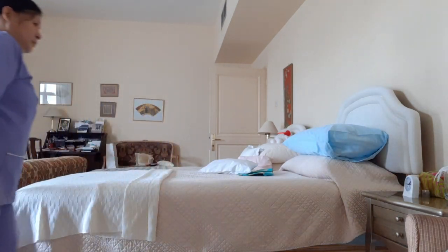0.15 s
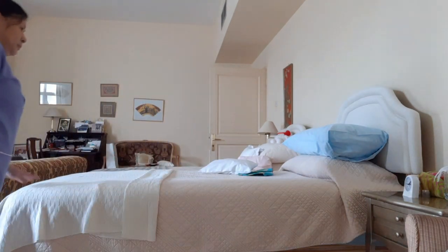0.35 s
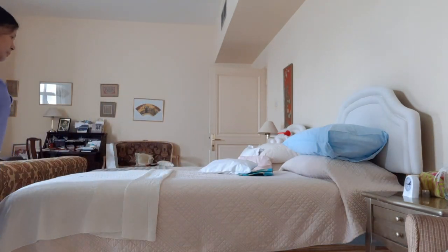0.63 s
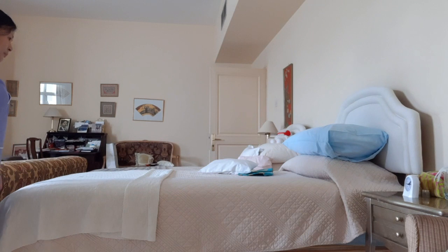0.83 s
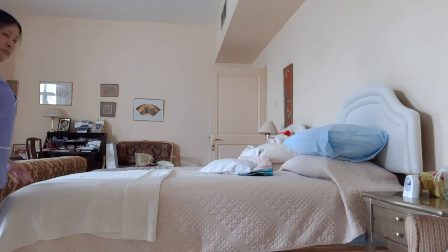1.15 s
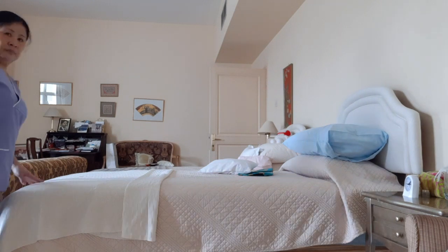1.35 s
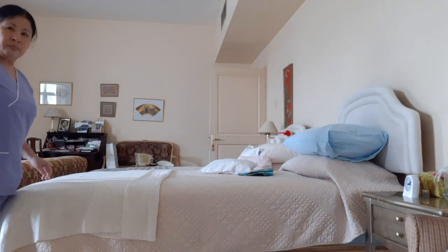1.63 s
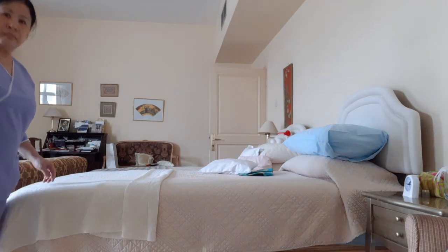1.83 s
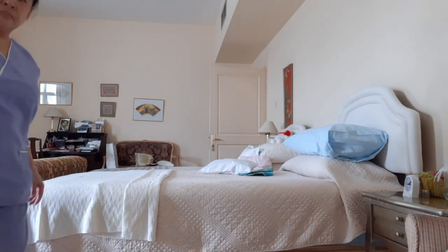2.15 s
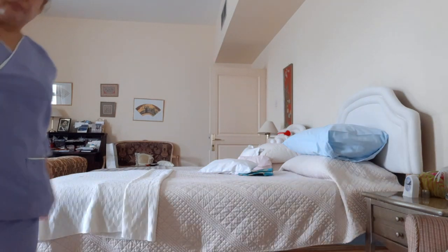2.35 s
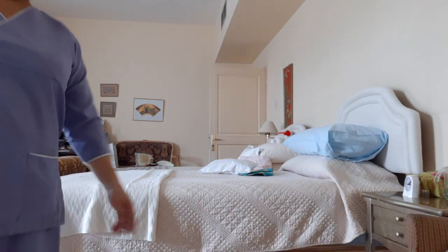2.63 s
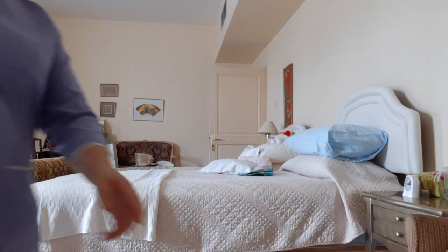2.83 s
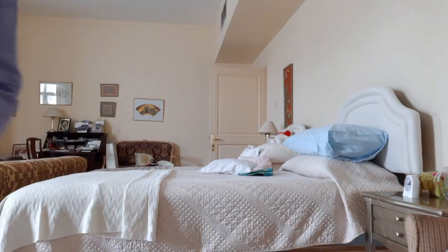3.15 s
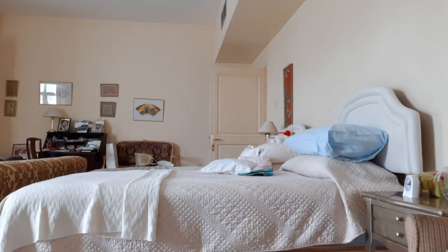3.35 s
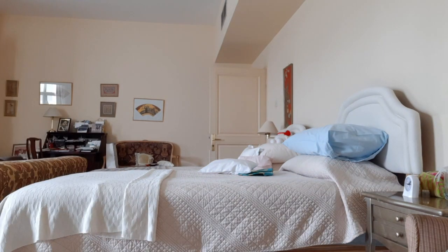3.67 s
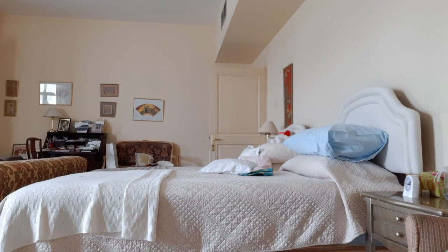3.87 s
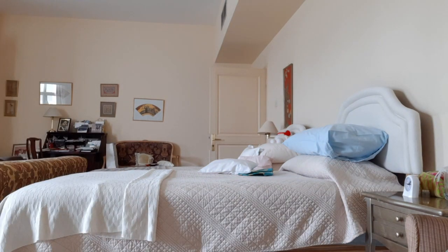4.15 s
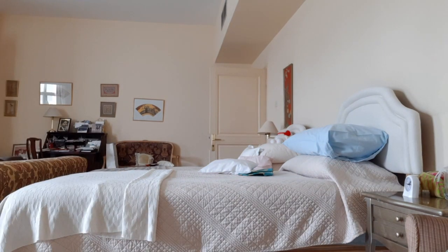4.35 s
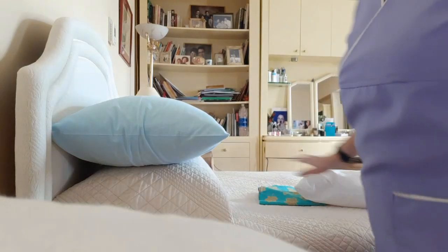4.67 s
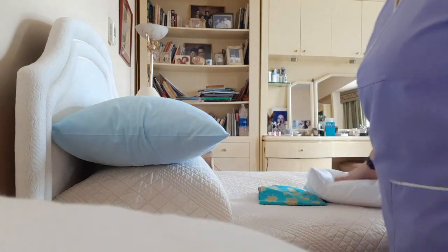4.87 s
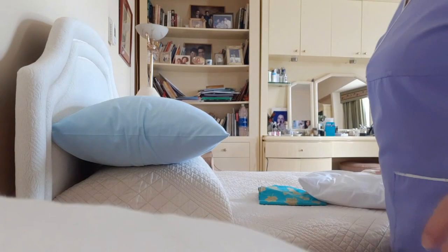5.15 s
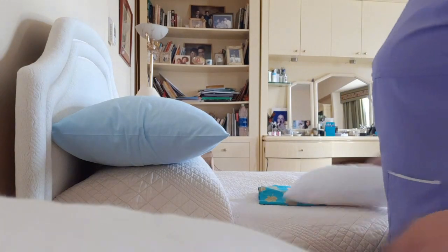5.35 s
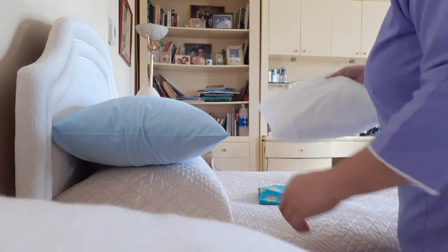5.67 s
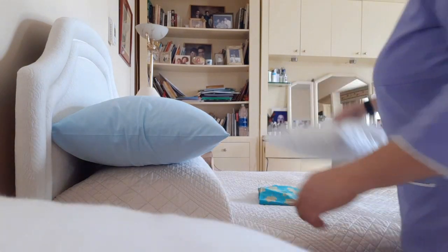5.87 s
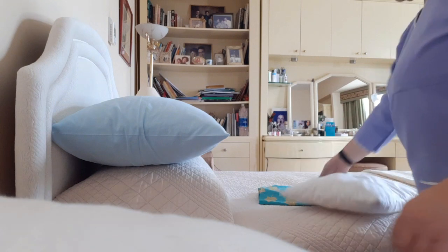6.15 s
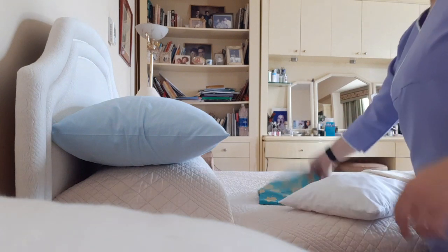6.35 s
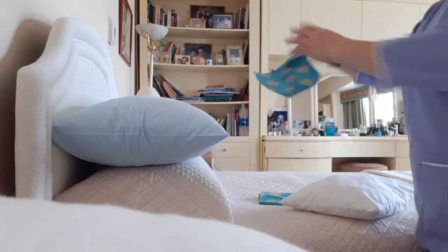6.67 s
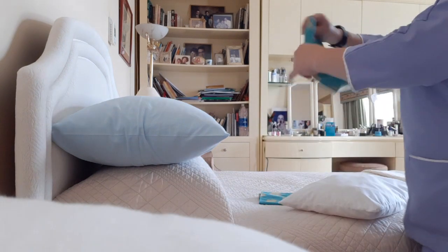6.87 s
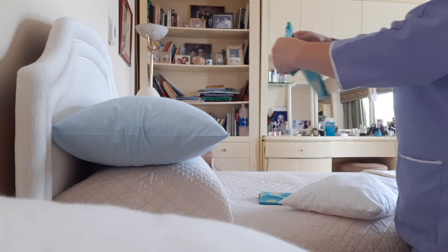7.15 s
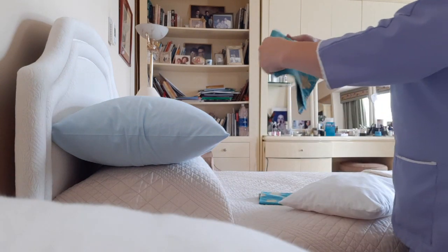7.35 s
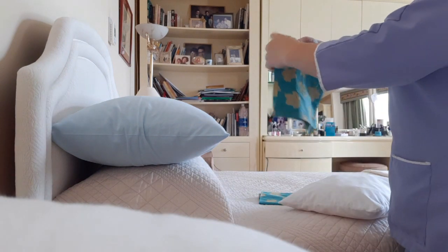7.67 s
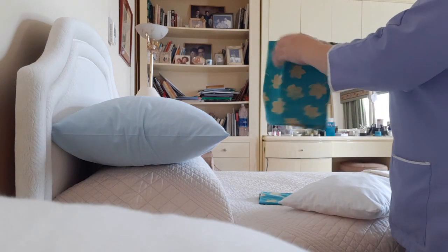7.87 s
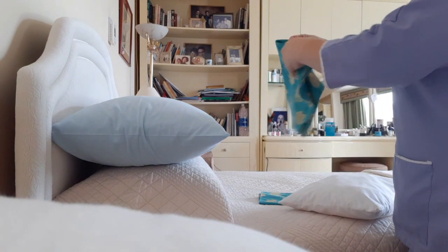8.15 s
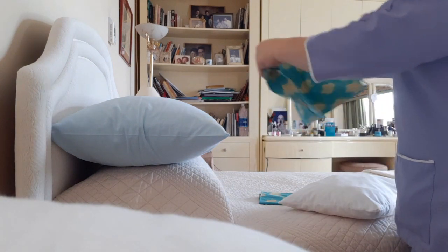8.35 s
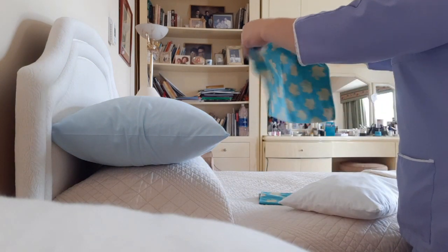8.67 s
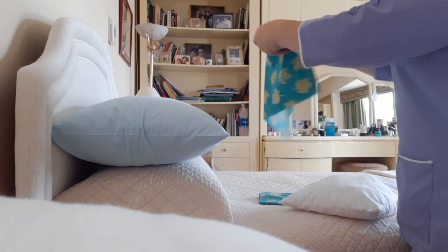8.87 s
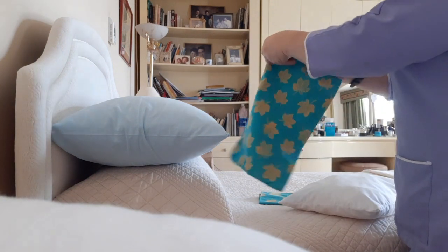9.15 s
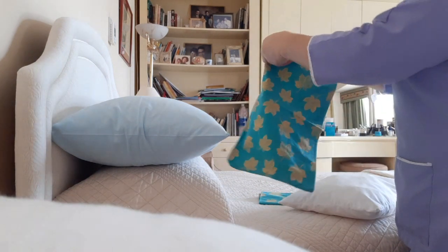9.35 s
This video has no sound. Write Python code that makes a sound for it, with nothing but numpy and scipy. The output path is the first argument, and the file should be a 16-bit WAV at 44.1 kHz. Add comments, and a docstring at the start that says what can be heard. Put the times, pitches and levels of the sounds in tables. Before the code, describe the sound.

In a quiet furnished bedroom, slippers shuffle on a hollow floor with grainy scuffs and dull heel knocks, ending in a long slide with a rough sinking groan. After a tiny silent gap the microphone is closer to the bed: cotton rustles, a pillow lands with a deep soft thump, and a pillowcase is shaken out lightly. Low ventilation rumble and thin hiss run beneath.

```python
"""Slippers and bed linen in a quiet bedroom

Two spots are heard in turn on two ports, left and right, with a very short silence between them.
First slippers scuff and knock on a hollow floor: grainy noise and blows drive the floor's resonances.
Then cloth rustles as shaped noise, and a pillow drops on the bed as bouncing pulses that ring the mattress.
Ventilation noise rumbles in the low resonances of the room, over a faint motor tone and a thin hiss."""
import sys
import numpy as np
from scipy import signal
from scipy.fft import rfft, irfft, next_fast_len
from scipy.io import wavfile
from scipy.ndimage import uniform_filter1d

SR = 44100
rng = np.random.default_rng(int(sys.argv[2]) if len(sys.argv) > 2 else 0)


def bounce(signal):
    """Save signal as a 16-bit WAV file at the path given by the first command-line argument."""
    frames = np.transpose(np.atleast_2d(signal))
    limited = np.clip(frames, -1, 1)
    pcm = np.round(limited * 32767).astype(np.int16)
    wavfile.write(sys.argv[1], SR, pcm)


N = 419391
TIME = np.arange(N) / SR  # seconds


def undb(db):
    """Decibels to gain."""
    return 10 ** (np.asarray(db) / 20)


def unit(x):
    """Scale to rms 1."""
    return x / np.sqrt(np.mean(x ** 2))


def curves(table):
    """Interpolate the columns of a table over time, one value a sample."""
    s, *columns = np.transpose(table)
    return [np.interp(TIME, s, column) for column in columns]


def colour(x, points):
    """Shape by a (Hz, dB) spectrum, drawn straight between points on a log frequency axis."""
    hz, db = np.transpose(points)
    size = next_fast_len(N)
    f = np.arange(size // 2 + 1) * SR / size + 1  # the 1 keeps the log finite
    gain = undb(np.interp(np.log(f), np.log(hz), db))
    return irfft(rfft(x, size) * gain, size)[..., :N]


def band(x, hz, width):
    """Two-pole resonance, gain 1 at the centre."""
    return signal.lfilter(*signal.iirpeak(hz, hz / width, SR), x)


def ring(x, modes):
    """A body of several resonances; neighbours answer in opposite sign."""
    return sum((-1) ** k * undb(db) * band(x, hz, width) for k, (hz, width, db) in enumerate(modes))


def walk(rate):
    """Random levels held 1 / rate seconds and slewed; spread near 1."""
    hold = int(SR / rate)
    steps = np.repeat(rng.standard_normal(N // hold + 1), hold)
    return 1.4 * uniform_filter1d(steps, hold)[:N]


def pair(likeness):
    """Noise at two ports that share a part; likeness is their correlation."""
    mid, side = rng.standard_normal((2, N))
    c = np.clip(likeness, -1, 1)
    return np.sqrt((1 + c) / 2) * mid + np.sqrt((1 - c) / 2) * side * np.array([[1], [-1]])


def pan(db):
    """Gains of the two ports, left minus right in dB."""
    return undb(np.array([[db], [-db]]) / 2)


def rub(points, grain_db, likeness, patchy_db):
    """Fibres catching and slipping: noise in uneven grains, whose colour shifts as the contact moves."""
    slips = pair(likeness) * undb(grain_db * walk(300) + 0.8 * grain_db * walk(60))
    for hz in (1800, 3400, 5800):
        slips = slips + (undb(patchy_db * walk(14)) - 1) * band(slips, hz, hz / 3)
    return unit(colour(slips, points))


def push(s, ms, cycles):
    """One short blow, a few swings under a smooth hump, placed in a silent track."""
    out, n = np.zeros(N), int(ms * SR / 1000)
    i = int(s * SR)
    blow = np.hanning(n) * np.sin(2 * np.pi * cycles * np.arange(n) / n)
    out[i:i + n] = blow[:N - i]
    return out


STEP = 88  # samples between the points of a stroke's shape
RISE_PER_HOLD = 0.16  # longer strokes gather speed more slowly
FADED_DB = -100  # every stroke sinks to this level within its release time


def strokes(table, rise_s, release_s):
    """Level in dB of each stroke over time: a quick rise, a hold, a steady fall."""
    s, hold, db = np.array(table).T[:3, :, None]
    age = TIME[::STEP] - s
    climb = -22 * np.clip(-age / (rise_s + RISE_PER_HOLD * hold), 0, 4) ** 1.5
    return db + climb - (db - FADED_DB) / release_s * np.clip(age - hold, 0, None)


def overlap(db):
    """Strokes add their powers; one gain a sample."""
    return np.interp(TIME, TIME[::STEP], np.sqrt(np.sum(undb(db) ** 2, axis=0)))


# Room resonances fed by the ventilation, at each spot. Each row: centre in Hz, width in Hz, relative dB.
RUMBLE_1 = [(66.4, 18, -5), (85.8, 12.4, 0), (102.3, 10.8, 0.5), (141.5, 15.7, 0), (162.5, 12.8, -3),
            (198, 12.3, -9.5), (224.8, 11.6, -9.5), (273, 26, -19)]
RUMBLE_2 = [(74.5, 29.7, -13), (102.9, 8.74, -1), (113, 11.35, -3), (142.6, 10.15, -0.5), (178.4, 8.9, -5),
            (196.3, 8.9, -9.5), (257.3, 13.3, -15), (334.4, 21, -26.5)]
# Slow swell of the rumble. Each row: time in seconds, level in dB.
SWELL = [(0.0, -50), (3.1, -49), (4.4, -50), (4.6, -46.5), (6.1, -46.5), (8.1, -45), (9.51, -45.5)]
# Colour of the still air and microphone hiss, at each spot. Each row: frequency in Hz, relative dB per Hz.
AIR_1 = [(180, -22), (300, -2), (384, -15.5), (552, -8), (640, -14.5), (767, -16), (1100, -26),
         (1440, -29.5), (5640, -40.5), (13300, -33.5), (15400, -32)]
AIR_2 = [(180, -31.5), (300, -5.5), (342, -2.5), (609, -18.5), (780, -19), (1080, -26.5), (5190, -36),
         (6870, -28.5), (8790, -36.5), (13700, -30.5), (15400, -32)]
AIR_DB = (-67, -69)  # hiss level at each spot
LEFT_DB = (4, 3)  # the left port is louder, at each spot


def ventilation(modes, air, air_db, left_db):
    """Duct noise fills the room resonances; above them a thin hiss flickers."""
    rumble = unit(ring(pair(1.0) * undb(1.34 * walk(6)), modes)) * undb(curves(SWELL)[0])
    flicker = undb(0.7 * walk(8))
    hiss = unit(colour(pair(0.057) * flicker, air)) * undb(air_db)
    return (rumble + hiss) * pan(left_db)


# Shaft tone. Each row: time in seconds, pitch in Hz, level in dB before the waver.
MOTOR = [(0, 48.5, -74), (3.3, 48, -60.5), (5.9, 50.2, -60), (9.51, 47.26, -60.5)]


def motor():
    """A low shaft tone, a sine whose level wavers."""
    hz, db = curves(MOTOR)
    tone = np.sin(2 * np.pi * np.cumsum(hz) / SR)
    return np.sqrt(2) * undb(db + 2.0 * walk(2)) * tone * pan(4.3)


# Small falling squeak. Each row: start in seconds, length in seconds, from Hz, to Hz, level in dB.
CHIRP = [(7.877, .023, 2350, 780, -63)]
# Faint ticks. Each row: start in seconds, fall to a third in seconds, centre in Hz, width in Hz, level in dB.
TICK = [(2.339, .008, 3600, 1500, -55), (2.460, .008, 3000, 2500, -65), (3.868, 0.013, 6500, 3000, -70.5)]


def small_sounds():
    """A falling squeak, a gliding sine, and faint ticks, fading bursts of narrow noise."""
    (s, length, from_hz, to_hz, db), = CHIRP
    u = np.clip((TIME - s) / length, 0, 1)
    hz = to_hz + (from_hz - to_hz) * (1 - u) ** 2
    shape = np.sqrt(np.sin(np.pi * u).clip(0))
    out = undb(db) * shape * np.sin(2 * np.pi * np.cumsum(hz) / SR)
    noise = pair(0.55)
    for s, fall, hz, width, db in TICK:
        fade = (TIME > s) * np.exp(-np.abs(TIME - s) / fall)
        out = out + undb(db) * fade * unit(band(band(noise, hz, width), hz, width))
    return out


# Linen strokes. Each row: full speed at seconds, hold in seconds, rustle in dB, padding above rustle in dB.
RUSTLE = [(4.756, 0.015, -62, 6), (4.884, .046, -65, -0.5), (5.362, 0.043, -77, 12), (5.453, .032, -72, 1),
          (5.703, 0.022, -82, 14.5), (5.95, 0.068, -76.5, 12.5), (6.224, .02, -81.5, 17.5),
          (6.295, 0.032, -79.5, 12), (6.363, .005, -68.5, -5), (6.646, .04, -76, 5),
          (6.862, 0.13, -66, -4.5), (7.184, 0.36, -78, -.6), (7.883, 0.037, -80, 0),
          (8.14, 0.076, -73, -4.5), (8.34, 0.04, -67.5, -2), (8.507, 0.17, -67.5, -9.5),
          (8.726, .02, -70, -19), (9.15, 0.11, -80, -1), (9.4, .04, -77.5, 0), (9.505, .02, -80, 5)]
RUSTLE_RISE_S, RUSTLE_RELEASE_S = 0.038, 0.2
# Faint stir of cloth between strokes. Each row: time in seconds, rustle in dB, padding above rustle in dB.
STIR = [(4.5, -93.5, 8), (5.06, -81, 12.5), (5.4, -81.5, 13), (6.2, -100, 7), (6.47, -80, -2),
        (7.0, -76, -3.5), (7.8, -94, 4), (7.95, -78, -1), (8.8, -86.5, 5), (9.25, -86, 3), (9.51, -88, 3)]
# Colours of the rustle, the duller body and the padding. Each row: frequency in Hz, relative dB per Hz.
LINEN = [(2500, -20), (4000, -13), (5200, -14), (6850, -8.5), (8500, -15), (14100, -17), (15400, -22.5)]
QUILT = [(700, -24), (1050, -6), (1400, -0.5), (2000, -3), (2450, -1), (3000, -7), (4200, -22)]
PADDING = [(300, -12.5), (480, 2.5), (680, -8.5), (810, -3.5), (1100, -19), (1600, -34)]
BODY_DB, BODY_PER_PADDING = -3, 0.39  # the harder the cloth is pressed, the more its body sounds
# Soft blows on the bed. Each row: time in seconds, base level in dB, base push length in ms.
THUMPS = [(5.319, -42.5, 4.3), (5.937, -47, 3.9), (5.9836, -22, 5.6), (8.334, -62, 2.5), (9.491, -54, 2.3)]
# Bounces of each blow. Each row: seconds after the blow, dB added to its level, share of its push length.
BOUNCES = [(0, 1.5, 0.98), (.0184, -3, 0.57), (.0274, -7.5, .39)]
# Mattress resonances. Each row: centre in Hz, width in Hz, relative dB.
BED_MODES = [(100.6, 17, 12.5), (168, 20, -28), (255, 18, -9), (320, 18, 9), (460, 16, -2), (600, 55, -12),
             (785, 130, -9)]
# The pillow stuffing settles. The row: start in seconds, half the rise in seconds, base level in dB.
CRUNCH = (5.983, 0.016, -45.5)


def linen():
    """Cotton rustles, with a duller body when it is pressed; blows boom in the mattress."""
    faint_db, faint_low_db = (c[::STEP] for c in curves(STIR))
    db = np.vstack([strokes(RUSTLE, RUSTLE_RISE_S, RUSTLE_RELEASE_S), faint_db])
    low_db = np.vstack([np.array(RUSTLE)[:, 3:] * np.ones_like(faint_db), faint_low_db])
    body_db = BODY_DB + BODY_PER_PADDING * low_db
    rustle = overlap(db) * rub(LINEN, 0.73, 0.16, 1.06)
    body = overlap(db + body_db) * rub(QUILT, 1.7, 0.13, 1.3)
    padding = overlap(db + low_db) * unit(colour(pair(0.44) * undb(2.8 * walk(60)), PADDING))

    blows = np.zeros(N)
    for s, blow_db, ms in THUMPS:
        for late, change_db, share in BOUNCES:
            blows += undb(blow_db + change_db) * push(min(s + late, TIME[-1]), ms * share, 0.94)
    thumps = (blows + 0.74 * ring(blows, BED_MODES)) * pan(LEFT_DB[1])

    s, rise, crunch_db = CRUNCH
    age = np.clip(TIME - s, 0, None) / rise
    stuffing = unit(band(band(pair(0.59), 680, 710), 790, 1000))
    crunch = undb(crunch_db) * age ** 2 * np.exp(-age) * stuffing
    return rustle + body + padding + thumps + crunch


GROAN_S, GROAN_DB = 3.10, -37.5  # start of full strength, level before the roughness
GROAN_HZ, GROAN_SAG_HZ_PER_S = 450.3, 1050  # pitch at that start, and its fall
GROAN_ATTACK_S, GROAN_HOLD_S, GROAN_RELEASE_S = 0.047, 0.094, 0.079  # attack and release: s per 30 dB


def groan():
    """In the longest slide the sole sticks and slips: a rough tone that sinks as the foot slows."""
    age = TIME - GROAN_S
    hz = (GROAN_HZ - GROAN_SAG_HZ_PER_S * age).clip(200, 700)
    rise_db = 30 * np.minimum(age / GROAN_ATTACK_S, 0)
    fall_db = -30 * np.maximum((age - GROAN_HOLD_S) / GROAN_RELEASE_S, 0)
    phase = 2 * np.pi * np.cumsum(hz * (1 + 0.03 * walk(120))) / SR
    tone = np.sin(phase) + undb(-10.0) * np.sin(2 * phase)
    level = undb(GROAN_DB + rise_db + fall_db + 2.3 * walk(70))
    return np.sqrt(2) * level * tone * pan(-1.5)


# Slipper slides. Each row: full speed at seconds, hold in seconds, hiss in dB, treble above hiss in dB,
# floor ring above hiss in dB, centre of the ring in Hz.
SCUFF = [(0.0, 0.073, -61, -3.5, 13.5, 524), (.301, .02, -74.5, 4, 5, 394),
         (0.603, 0.032, -57, -3.5, -4, 403), (.684, 0.031, -67, 4.5, 15, 430),
         (.785, 0.05, -58.5, 3, 8, 497), (1.013, 0.016, -63, -8, 7, 354), (1.084, .01, -74, -15, 27.5, 406),
         (1.11, 0.031, -60, -11, -3, 446), (1.337, .01, -75.5, 2.5, 9, 400),
         (1.462, 0.02, -71.5, -29, -8, 600), (1.954, 0.061, -76, 4.5, 16.5, 433),
         (2.229, 0.08, -49.5, -9.5, 1.2, 450), (2.355, 0.13, -62.5, -10, 2, 416),
         (2.955, 0.0074, -66, 4, -7, 400), (2.998, .004, -61.5, 4.5, 5.5, 390),
         (3.066, 0.041, -51, 7, 9, 444), (3.11, 0.14, -42.5, -6.5, 5, 365),
         (3.431, 0.071, -63.5, -2.5, -4, 450)]
SCUFF_RISE_S, SCUFF_RELEASE_S = 0.031, 0.15
# Faint shuffle between the slides. Each row: time in seconds, hiss in dB, treble above hiss in dB.
SHUFFLE = [(0, -80, 6), (1.5, -88.5, -6), (1.66, -74, -20), (2.15, -82.5, -10), (2.55, -71.5, -6),
           (2.76, -69, 0), (2.97, -69, 2), (3.04, -86, -1), (3.55, -83.5, 0), (4.45, -91, -2.5)]
SHUFFLE_RING_DB, SHUFFLE_RING_HZ = 5.5, 440  # floor ring above hiss, its centre
# Colour of the sliding sole. Each row: frequency in Hz, relative dB per Hz.
SOLE = [(410, -38), (700, -6.5), (828, -2.5), (1120, -9), (1480, -6), (2100, -13.5), (3100, -12.5),
        (4800, -16), (6300, -12), (7500, -17), (8600, -29.5), (13200, -39), (15400, -45)]
# Hollow floor resonances. Each row: centre in Hz, width in Hz, relative dB.
FLOOR_MODES = [(238, 24, -11), (322, 29, -7.5), (350, 20, -6.5), (407.3, 31.5, -1.5), (473.5, 25, -5.5),
               (509, 36, -4), (612, 18, -23), (666, 10, -21), (805, 90, -8)]
# Heel knocks. Each row: time in seconds, strength of the blow in dB, centre of the blow in Hz.
KNOCKS = [(1.085, -32.5, 383), (1.733, -46, 230), (1.961, -46, 398), (2.322, -26, 346), (2.778, -38, 382),
          (2.805, -38.5, 616), (2.841, -39, 322), (3.736, -50.5, 230)]
# Side of the feet. Each row: time in seconds, left minus right in dB.
WALKER = [(0, 1.5), (.8, 2.5), (1.2, 3.5), (2.0, 2.5), (2.25, .6), (2.8, 2.5), (3.1, -2.5), (3.4, 4.5),
          (4.4, 1.5)]


def slippers():
    """Soles hiss as they slide and shake the floor's resonances; heels knock the same floor."""
    faint_db, faint_treble_db = (c[::STEP] for c in curves(SHUFFLE))
    flat = np.ones_like(faint_db)
    treble_db, ring_db, ring_hz = np.array(SCUFF).T[3:, :, None] * flat
    db = np.vstack([strokes(SCUFF, SCUFF_RISE_S, SCUFF_RELEASE_S), faint_db])
    treble_db = np.vstack([treble_db, faint_treble_db])
    ring_db = np.vstack([ring_db, SHUFFLE_RING_DB * flat])
    ring_hz = np.append(ring_hz[:, 0], SHUFFLE_RING_HZ)[:, None]

    slips = rub(SOLE, 1.2, 0.022, 2.54)
    low = signal.lfilter([0.3], [1, -0.7], slips)
    treble = unit(slips - low) * overlap(db + treble_db) * pan(-1.5)
    out = unit(low) * overlap(db) + treble
    drag = unit(pair(1.0) * undb(3.1 * walk(60))) * pan(2.0)  # the left port favours the bass
    for hz, width, mode_db in FLOOR_MODES:
        # where the foot stands decides which resonances answer best
        near_db = -12.0 * (np.log2(hz / ring_hz) / 0.34) ** 2
        out = out + unit(band(drag, hz, width)) * overlap(db + ring_db + mode_db + near_db.clip(-22))

    blows = np.zeros(N)
    for s, knock_db, hz in KNOCKS:
        click = undb(-13) * push(s, 1.5, 1.37)
        blows += undb(knock_db) * (push(s, 2200 / hz, 2.21) + click)
    side_db = curves(WALKER)[0]
    knocks = blows + 3.2 * ring(blows, FLOOR_MODES)
    return (out + knocks) * undb(np.array([side_db, -side_db]) / 2)


ROOM_T60_S, ROOM_DB = 0.3, -6  # time for the bass to fall 60 dB, level of the tail


def room(x):
    """A soft furnished room: a fading noise tail; its bass starts weaker, fades sooner, is alike at both ports."""
    t = np.arange(int(0.5 * SR)) / SR
    both, left, right = rng.standard_normal((3, len(t))) * (t > 0.004)
    bass = signal.lfilter([0.07], [1, -0.93], both)
    treble = np.array([left, right]) - signal.lfilter([0.07], [1, -0.93], [left, right])
    tail = bass * undb(-6 - 60 * t / ROOM_T60_S) + treble * undb(-60 * t / (1.26 * ROOM_T60_S))
    tail = tail / np.sqrt(np.sum(tail ** 2, axis=1, keepdims=True))
    return x + undb(ROOM_DB) * signal.fftconvolve(x.mean(axis=0)[None], tail, axes=1)[:, :N]


STOP_S, RESUME_S = 4.4568, 4.4901  # the first spot falls silent, the second spot starts
CUT_FADE_S = 0.003  # fade out of the first spot
LEFT_LAG = (-11, 7)  # samples; the left port hears earlier at the first spot, later at the second


def scene():
    """The first spot, a gap, then the second spot."""
    first = np.clip((STOP_S - TIME) / CUT_FADE_S, 0, 1)
    second = TIME >= RESUME_S
    near = room((slippers() + groan()) * first + linen() * second + small_sounds()) + motor()
    spot_1 = near + ventilation(RUMBLE_1, AIR_1, AIR_DB[0], LEFT_DB[0])
    spot_2 = near + ventilation(RUMBLE_2, AIR_2, AIR_DB[1], LEFT_DB[1])
    spot_1[0] = np.roll(spot_1[0], LEFT_LAG[0])
    spot_2[0] = np.roll(spot_2[0], LEFT_LAG[1])
    return spot_1 * first + spot_2 * second


TOP_HZ = 15500


def record(dry):
    """The stereo phone drops the deepest bass and cuts the top steeply."""
    dry = signal.sosfilt(signal.butter(2, 38, "high", fs=SR, output="sos"), dry)
    return signal.sosfilt(signal.ellip(10, 0.2, 80, TOP_HZ, fs=SR, output="sos"), dry)


dry = scene()
out = record(dry)
bounce(out)
```